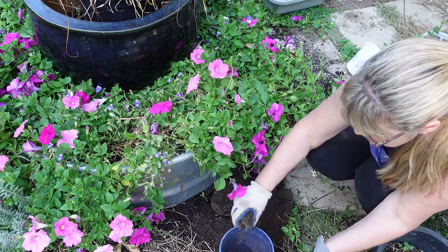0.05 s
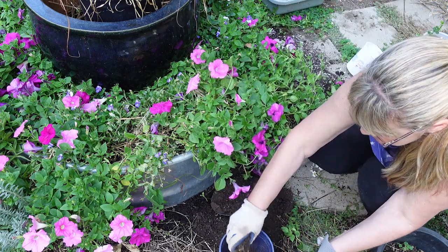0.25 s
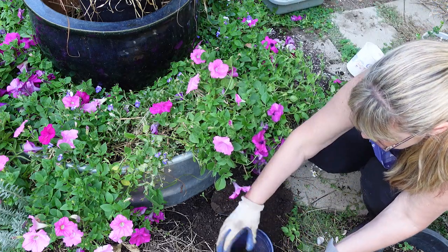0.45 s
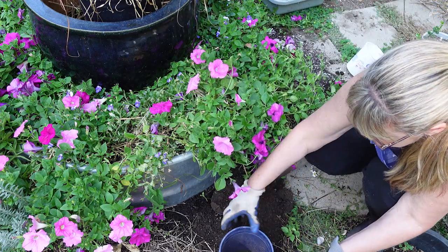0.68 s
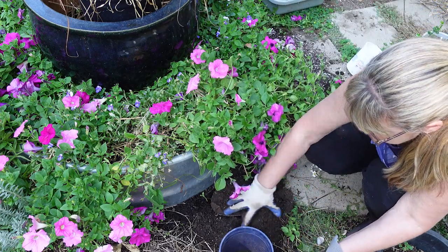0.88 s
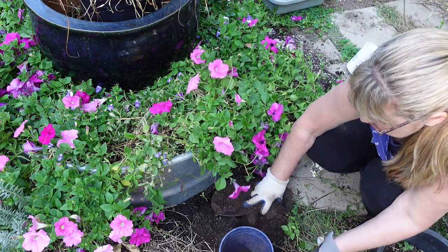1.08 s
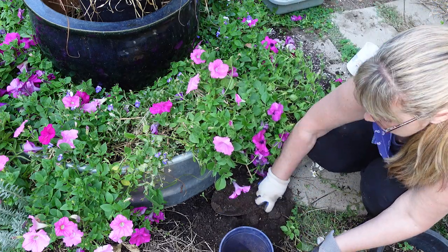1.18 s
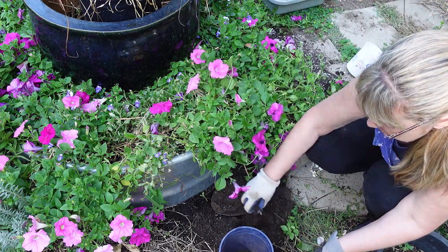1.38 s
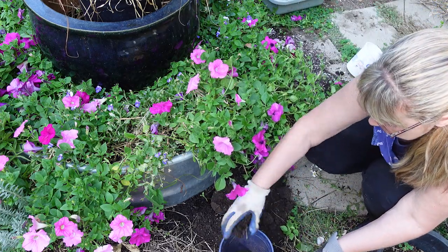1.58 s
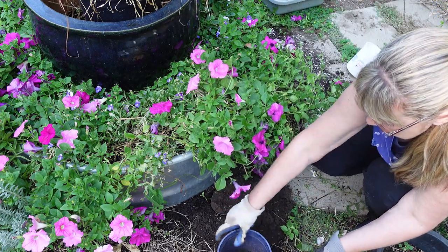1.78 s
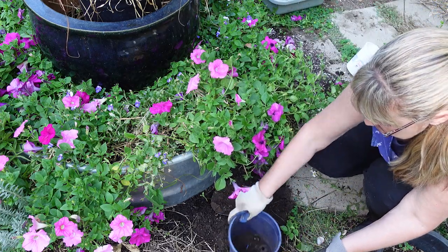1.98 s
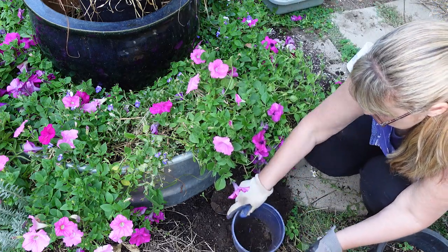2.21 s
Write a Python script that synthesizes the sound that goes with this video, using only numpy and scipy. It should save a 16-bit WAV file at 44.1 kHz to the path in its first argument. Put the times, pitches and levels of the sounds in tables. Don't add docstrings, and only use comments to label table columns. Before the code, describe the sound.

Loose soil and clods rattle into a small plastic pot, then a gloved hand rasps over earth

```python
import sys
import numpy as np
from scipy import signal
from scipy.fft import rfft, irfft
from scipy.io import wavfile

SR = 44100
rng = np.random.default_rng(int(sys.argv[2]) if len(sys.argv) > 2 else 0)


def natural_amplitude(level_db):
    exponent = np.asarray(level_db, float) / 20
    return 10 ** exponent


def materialize(psi):
    bounded = np.clip(np.atleast_2d(psi).T, -1, 1)
    quanta = np.round(bounded * 32767).astype(np.int16)
    wavfile.write(sys.argv[1], SR, quanta)


N = 99225
HIT = 4096
HIT_T = np.arange(HIT) / SR


def rms_one(x):
    return x / np.sqrt(np.mean(x ** 2) + 1e-20)


def drift(rate_hz):
    r = np.exp(-2 * np.pi * rate_hz / SR)
    wander = signal.lfilter([1], [1, -2 * r, r * r], rng.standard_normal(N + 9000))
    return rms_one(wander[9000:])


def band(x, order, edge_hz, kind):
    return signal.sosfilt(signal.butter(order, edge_hz, kind, fs=SR, output="sos"), x)


def smooth_band(x, edge_hz, kind):
    return signal.sosfiltfilt(signal.butter(2, edge_hz, kind, fs=SR, output="sos"), x)


def ring(clicks, hz, t60_s):
    r = natural_amplitude(-60 / (t60_s * SR))
    w = 2 * np.pi * min(hz, 0.45 * SR) / SR
    return signal.lfilter([0, np.sin(w)], [1, -2 * r * np.cos(w), r * r], clicks + 1e-18)


def colour(x, spectrum):
    hz, db = np.transpose(spectrum)
    log_f = np.log(np.fft.rfftfreq(N, 1 / SR) + 1)
    gain = natural_amplitude(np.interp(log_f, np.log(hz), db, left=-70, right=-70))
    return rms_one(irfft(rfft(x) * gain, N))


def grains(per_s, spread_db):
    size = natural_amplitude(spread_db * np.minimum(rng.exponential(1, N), 4))
    sign = rng.choice([-1, 1], N)
    return size * sign * (rng.random(N) < per_s / SR)


def hits(rows, sound):
    out = np.zeros(N + HIT)
    noise = rng.standard_normal((len(rows), HIT))
    for row, own in zip(rows, noise):
        i = int(row[0] * SR)
        out[i:i + HIT] += natural_amplitude(row[1]) * sound(row, own)
    return out[:N]


def swells(rows, extra_db=0):
    t = np.arange(N) / SR
    power = np.zeros(N)
    for row, extra in zip(rows, np.broadcast_to(extra_db, len(rows))):
        peak, rise, fall, level = row[:4]
        away = np.abs(np.where(t < peak, (t - peak) / rise, (t - peak) / fall))
        power += natural_amplitude(level + extra) ** 2 * np.exp(-4 * away ** 1.5)
    return np.sqrt(power)


def patchy(x, flicker_db, rate_hz):
    octave = np.log2(np.fft.rfftfreq(N, 1 / SR) / 1000 + 1e-6).clip(0, 4)
    spec = rfft(x)
    out = np.zeros(N)
    for k in range(9):
        share = (1 - 2 * abs(octave - k / 2)).clip(0)
        out += natural_amplitude(flicker_db * drift(rate_hz)) * irfft(spec * share, N)
    return rms_one(out)


def filled():
    return natural_amplitude(-2.5 * (np.arange(N) > SR))


# [f/Hz, level/dB]
GARDEN_TONE = [(15, -38), (25, -4.5), (74, 0.5), (170, 0.5), (276, -6.5), (527, -2), (1360, -13.5),
               (8970, -22.5), (15800, -29.5)]


def garden():
    air = colour(rng.standard_normal(N), GARDEN_TONE)
    low = smooth_band(air, 350, "low")
    return natural_amplitude(-53) * (air - low + low * natural_amplitude(2 * drift(23)))


# [f/Hz, t60/s, level/dB]
POT_MODES = [(400, 0.053, -25.5), (702, 0.015, -5.5), (1290, 0.0057, -7), (1570, 0.017, -4.5),
             (1926, 0.015, -7), (2500, 0.0087, -3), (2716, 0.01, -1.5), (3166, 0.0041, 3.5),
             (4220, 0.002, -1.5), (6000, 0.0028, -21.5)]


def pot(clicks, low_gain=1):
    modes = np.zeros(N)
    for hz, t60_s, db in POT_MODES:
        weight = low_gain if hz < 2100 else 1
        modes += natural_amplitude(db) * ring(clicks * rng.standard_normal(N) * weight, hz, t60_s)
    modes = signal.lfilter(*signal.iirnotch(878, 2.5, fs=SR), modes)
    return band(modes, 3, 260, "high")


# [peak t/s, rise t/s, fall t/s, crumb level/dB, sand level/dB over it]
SHOWERS = [(.066, 0.063, 0.095, -47.5, -4), (.135, 0.049, 0.016, -51, 3.5), (0.192, 0.059, 0.078, -42, -5),
           (0.248, 0.013, 0.056, -36, 2), (0.31, 0.022, 0.07, -20.5, -7.5), (0.375, .035, 0.026, -20, -14),
           (0.411, 0.049, 0.034, -27, -7.5), (0.481, 0.061, 0.12, -28, -6.5),
           (0.519, 0.07, 0.062, -22, -16), (0.559, 0.025, 0.1, -40.5, -9),
           (0.63, 0.043, 0.068, -44.5, -8.5), (1.582, 0.014, 0.019, -49, 1.5),
           (1.633, 0.054, 0.039, -51, -2.5), (1.751, 0.011, 0.012, -35, -4.5),
           (1.786, 0.016, 0.023, -33.5, -2), (1.827, 0.056, 0.072, -29, -8.5),
           (1.9, 0.024, 0.11, -41.5, -7), (2.05, 0.17, 0.15, -43, -8.5), (2.14, 0.024, 0.023, -42, 0),
           (2.176, 0.054, 0.038, -35.5, -14), (2.24, 0.074, .05, -54.5, -5)]
# [f/Hz, level/dB]
SAND_TONE = [(3000, 6), (4500, 1), (8000, -6.5), (13000, -7.5), (15800, -10)]


def pour():
    clump_db = np.clip(2.0 * (drift(90) + drift(350)), -10, 4)
    crumbs = rms_one(pot(grains(2500, 2.2) * natural_amplitude(clump_db), filled()))
    gust_db = np.clip(3 * drift(200), -7, 6)
    sand = colour(grains(12000, 3.0) * natural_amplitude(clump_db / 2 + gust_db), SAND_TONE)
    sand_level = swells(SHOWERS, np.array(SHOWERS)[:, 4])
    return natural_amplitude(-5) * swells(SHOWERS) * crumbs + sand_level * patchy(sand, 5.3, 157)


# [t/s, level/dB, f/Hz, sand spray level/dB]
CLODS_FIRST = [(0.0256, -31, 2300, -10), (0.0743, -29.5, 2680, -24), (0.114, -36, 3150, -3.5),
               (0.1335, -24.5, 2900, -28), (0.1671, -30.5, 3000, -11.5), (0.2022, -18, 2960, -47),
               (0.2354, -10, 2940, -34), (0.2664, -12, 2870, -34), (0.3062, -9, 2560, -31),
               (0.3122, -9.5, 2860, -26), (0.3288, -10.5, 2650, -27), (0.3748, -14.5, 2420, -15.5),
               (0.4402, -17.5, 3180, -17), (0.504, -10, 1590, -24), (0.5196, -15, 2670, -26),
               (0.5277, -16, 2630, -18), (0.5408, -8, 2610, -33), (0.597, -26.5, 2210, -20),
               (0.6207, -18.5, 2690, -24)]
# [t/s, level/dB, f/Hz, sand spray level/dB]
CLODS_SECOND = [(1.33, -38.5, 4730, -12), (1.563, -39, 2800, -12), (1.58, -35.5, 3090, -15),
                (1.586, -38, 2930, -6), (1.634, -40, 2770, -10), (1.668, -44, 2870, -20),
                (1.6121, -35, 3030, -8), (1.676, -28, 3060, -4), (1.6884, -32.5, 2920, -25),
                (1.6964, -37, 2870, -10), (1.7377, -38.5, 2870, -2), (1.762, -31, 2140, -13),
                (1.7716, -25, 2900, -11.5), (1.7847, -18, 2850, -15.5), (1.7924, -23.5, 2850, -24),
                (1.8238, -17, 2960, -29), (1.8406, -13, 2670, -17), (1.8884, -22.5, 2870, -27),
                (1.9609, -33.5, 1680, -21), (2.026, -25, 3150, -20), (2.0374, -29.5, 3570, -21),
                (2.0454, -27, 3460, -24), (2.0544, -22, 2810, -22), (2.1765, -29, 2500, -14.5),
                (2.1918, -28, 3330, -17), (2.2352, -35.5, 2540, -21)]
# [t/s, level/dB, f/Hz]
MORE_CLODS = [(0.0077, -46, 2980), (0.0298, -29, 2980), (0.064, -32, 3000), (0.085, -38, 3570),
              (0.098, -34, 2900), (0.1398, -31, 3480), (0.1776, -30, 2720), (0.198, -28, 2260),
              (0.2222, -40, 2430), (0.2392, -26, 2800), (0.246, -28, 2650), (0.2625, -26, 3150),
              (0.281, -22.5, 3120), (0.3021, -13, 2440), (0.3236, -18, 2950), (0.3347, -18, 3130),
              (0.3546, -18, 1400), (0.3608, -20, 2520), (0.3659, -16, 2850), (0.3844, -16, 2570),
              (0.4001, -19, 2750), (0.4038, -19.5, 4350), (0.4075, -15.5, 2970), (0.4133, -18, 2980),
              (0.4192, -20, 2760), (0.4245, -21, 2780), (0.467, -17.5, 2750), (0.4718, -18.5, 1630),
              (0.4773, -20, 2780), (0.4808, -18, 2750), (0.4873, -17, 2300), (0.5071, -11.5, 2560),
              (0.563, -21, 2500), (0.5723, -31, 2330), (0.5759, -33, 2370), (0.6231, -25, 2350),
              (0.631, -28, 3080), (0.651, -35, 3210), (1.729, -50, 1780), (1.7437, -32, 1890),
              (1.7499, -28, 1730), (1.7773, -21.5, 2730), (1.7881, -19, 2640), (1.796, -25, 2700),
              (1.8443, -22, 3080), (1.8572, -27, 3440), (1.8736, -30, 1580), (1.9204, -32, 2900),
              (1.93, -31, 2160), (1.9406, -35, 2900), (2.106, -34, 2830), (2.127, -39, 3000), (2.139, -33, 2640),
              (2.1558, -30, 2510), (2.168, -30.5, 3470), (2.185, -35, 2950)]


def clods():
    t60_s, contact_s, spray_s, trail_s = 0.0065, 0.00012, 0.0015, 0.002
    body_db, trail_db, more_spray_db = -16, -30, -27.5
    soft = np.exp(-((HIT_T - 0.001) / contact_s) ** 2)
    lumps = [(*lump, more_spray_db) for lump in MORE_CLODS]
    rows = np.vstack([CLODS_FIRST, CLODS_SECOND, lumps])

    def knock(row, noise):
        tone = ring(soft * np.sin(2 * np.pi * row[2] * HIT_T), row[2], t60_s)
        tone = np.diff(tone, prepend=0)
        spray = band(noise * np.exp(-HIT_T / spray_s), 2, [4500, 13000], "band")
        return tone / np.abs(tone).max() + natural_amplitude(row[3] + 5.5) * spray

    def crumble(row, noise):
        body = np.arange(HIT) == 40
        return natural_amplitude(body_db) * body + natural_amplitude(trail_db) * noise * np.exp(-HIT_T / trail_s)

    return hits(rows, knock) + pot(hits(rows, crumble), filled())


# [t/s, level/dB, f/Hz]
TICKS = [(0.0885, -26, 8950), (0.0977, -25, 13300), (0.3755, -5, 5600), (0.5085, -12, 10700),
         (0.5352, -20, 13200), (0.6875, -31.5, 7500), (0.7006, -31.5, 7800), (0.7325, -33, 7260),
         (0.76, -37, 8500), (0.7905, -29.5, 8000), (0.831, -37, 10400), (0.896, -35, 10500),
         (0.84, -29.5, 9700), (0.8776, -33, 7220), (0.9042, -25.5, 7000), (0.9118, -26.5, 8400),
         (0.9195, -24.5, 8850), (1.3364, -37, 6800), (1.3713, -36.5, 8300), (1.7085, -38, 6980),
         (1.073, -21, 10500), (1.182, -39, 10000), (1.229, -38, 9500), (1.403, -31, 9300),
         (0.4595, -36, 5600)]


def ticks():
    def snap(row, noise):
        tone = ring(1.0 * (HIT_T == 0), row[2], 0.0011)
        scratch = 0.1 * np.diff(noise, prepend=0) * np.exp(-HIT_T / 0.0003)
        x = band(tone + scratch, 3, 0.33 * row[2], "high")
        return x / np.abs(x).max()

    return hits(TICKS, snap)


# [t/s, level/dB, f/Hz]
THUMPS = [(.197, -31.5, 536), (2.04, -38.5, 290), (2.175, -37.5, 288), (.305, -35, 260), (.36, -35, 400),
          (.467, -24, 664), (.558, -18.5, 570), (.59, -34.5, 182), (.75, -40, 400), (.835, -44.5, 149),
          (.881, -40.5, 345), (.91, -38.5, 159), (.9632, -30, 634), (.9625, -29, 310), (.966, -39, 132),
          (1.253, -35.5, 395), (1.749, -23, 674)]


def thumps():
    cycles, slap_db, slap_hz = 7.44, -13, 1460

    def push(row, noise):
        hz = row[2]
        swell = (1 - np.exp(-HIT_T / 0.0011)) * natural_amplitude(-60 * HIT_T * hz / cycles)
        body = swell * np.sin(2 * np.pi * hz * HIT_T * np.exp(-HIT_T / 0.08))
        slap = band(noise * np.exp(-HIT_T / 0.0043), 2, [hz, slap_hz], "band")
        return 1.35 * body + natural_amplitude(slap_db) * 2 * slap / np.abs(slap).max()

    return hits(THUMPS, push)


# [peak t/s, rise t/s, fall t/s, level/dB]
CLOTH = [
    (.78, 0.16, 0.19, -59),
    (.91, 0.021, 0.032, -56),
    (.963, 0.011, 0.013, -49),
    (1.44, 0.068, 0.08, -56),
]


def cloth():
    rustle = band(grains(5000, 3.0), 2, [5600, 10200], "band")
    return swells(CLOTH) * rms_one(rustle)


# [peak t/s, rise t/s, fall t/s, level/dB]
RAKE = [
    (1.035, 0.073, 0.083, -39),
    (1.08, 0.055, 0.11, -40),
    (1.135, 0.045, 0.11, -43.5),
    (1.22, 0.09, 0.082, -48),
    (1.254, 0.012, 0.019, -46),
    (1.33, 0.013, 0.029, -50.5),
]
# [f/Hz, level/dB]
RASP_TONE = [(300, -14), (600, -2.5), (1100, -5.5), (1800, -2), (3500, -10), (6500, -4.5), (11000, -5.5),
             (15800, -12.5)]


def rake():
    slips = grains(12000, 2.0) * natural_amplitude(drift(60) + 1.5 * drift(300))
    echo_s, echo_db, grows_per_s = 0.00045, -11, 0.5
    since_peak = (np.arange(N) / SR - RAKE[0][0]).clip(0)
    delay = echo_s * SR * (1 + grows_per_s * since_peak)
    source = (np.arange(N) - delay).astype(int).clip(0)
    slips = slips + natural_amplitude(echo_db) * slips[source]
    rasp = patchy(colour(slips, RASP_TONE), 2, 35)
    level = swells(RAKE)
    top = smooth_band(rasp, 10000, "high")
    return level * (rasp - top + top * np.sqrt(level / level.max()))


def scene():
    return (garden() + pour() + clods() + ticks() + thumps() + cloth() + rake())[None]


def roll_off(x):
    return signal.sosfilt(signal.butter(12, 16540, fs=SR, output="sos"), x)


def record(dry):
    cut = signal.sosfilt(signal.cheby2(10, 60, 16700, fs=SR, output="sos"), dry)
    return roll_off(cut)


dry = scene()
out = record(dry)
materialize(out)
```